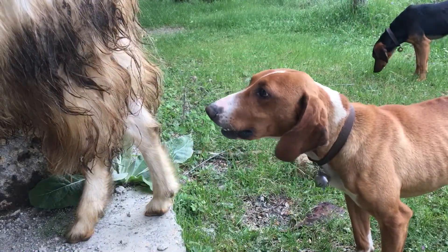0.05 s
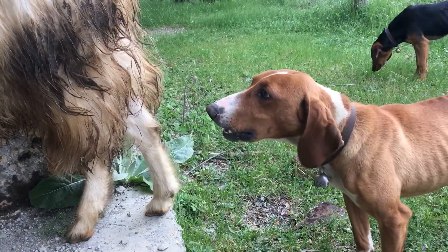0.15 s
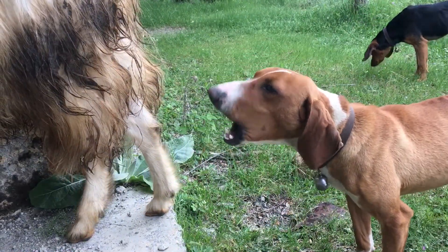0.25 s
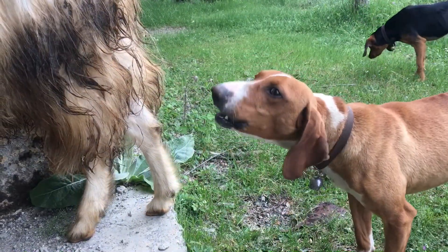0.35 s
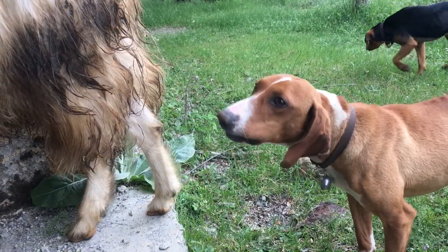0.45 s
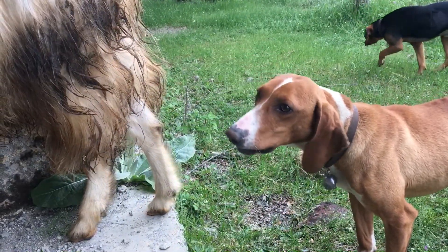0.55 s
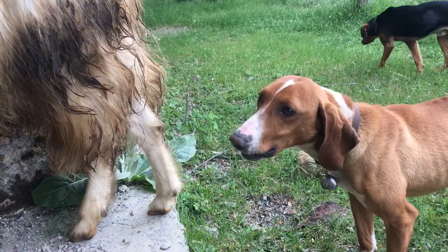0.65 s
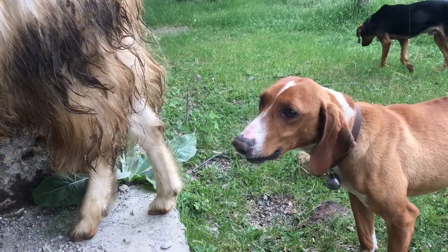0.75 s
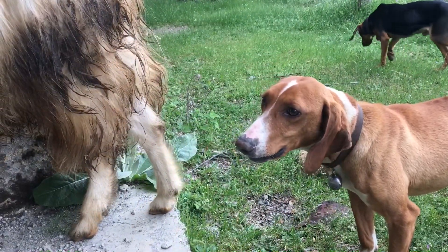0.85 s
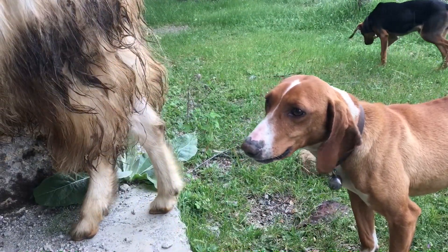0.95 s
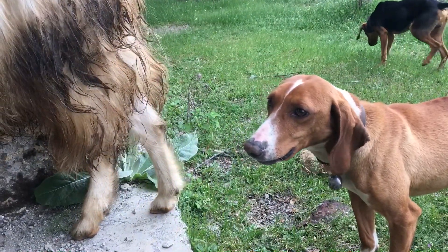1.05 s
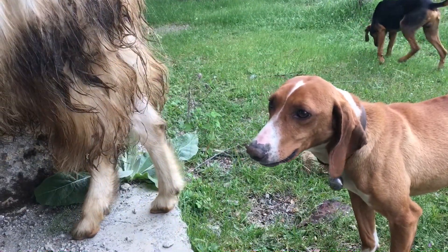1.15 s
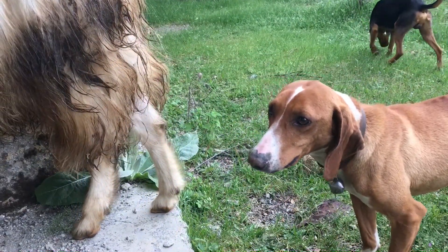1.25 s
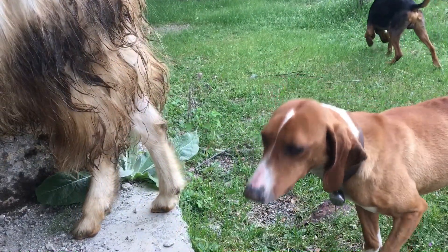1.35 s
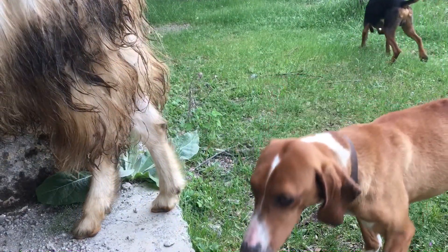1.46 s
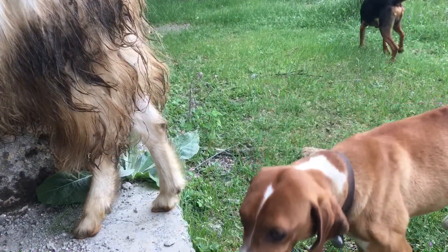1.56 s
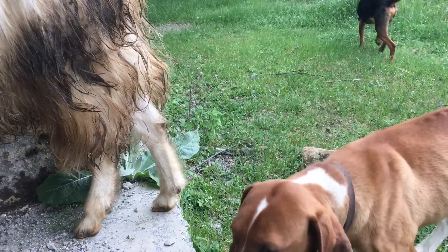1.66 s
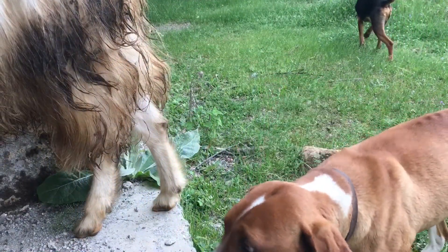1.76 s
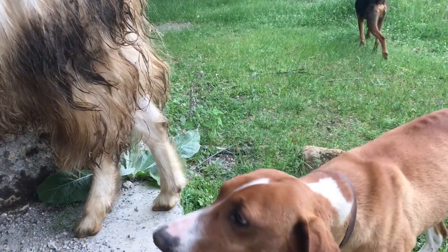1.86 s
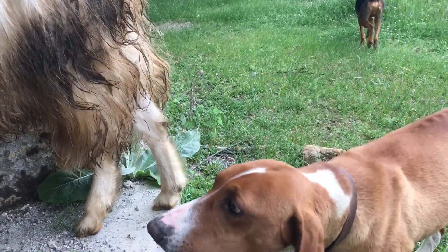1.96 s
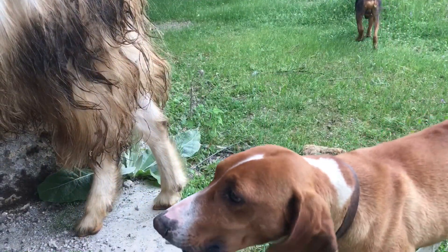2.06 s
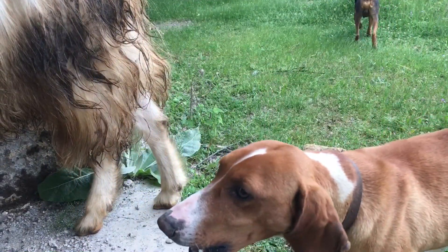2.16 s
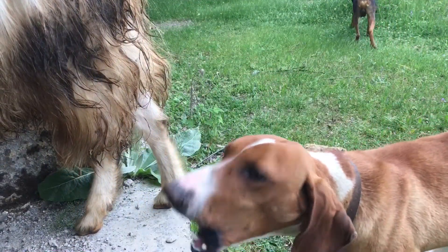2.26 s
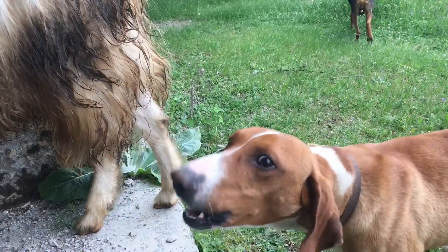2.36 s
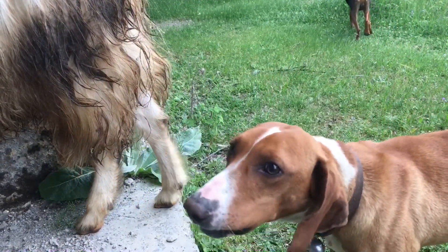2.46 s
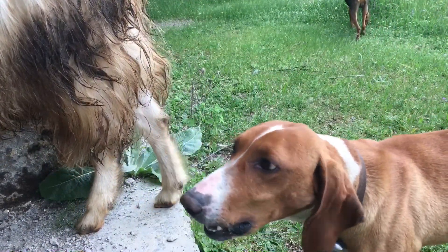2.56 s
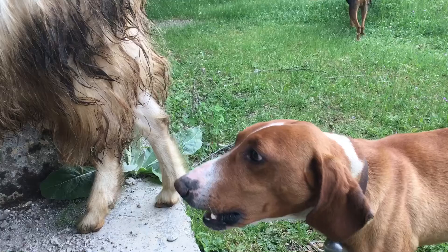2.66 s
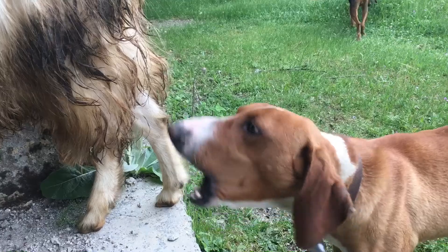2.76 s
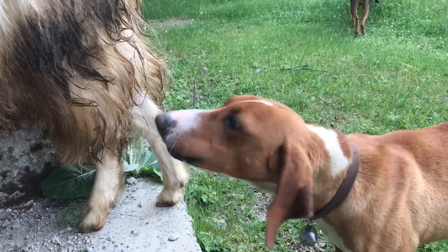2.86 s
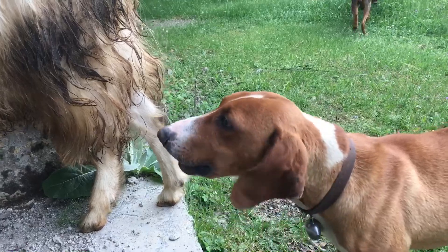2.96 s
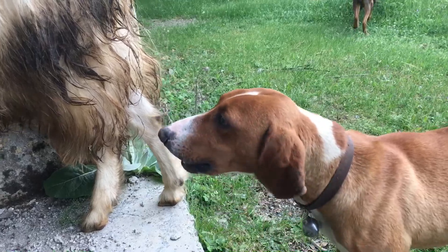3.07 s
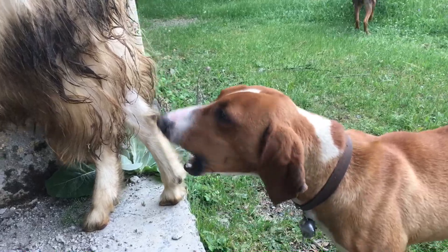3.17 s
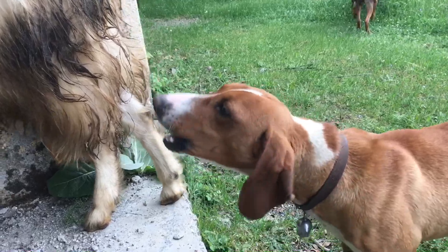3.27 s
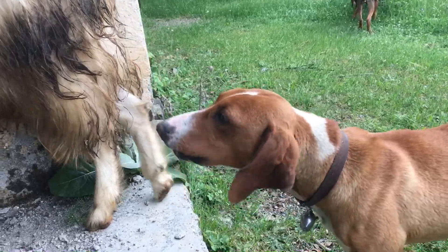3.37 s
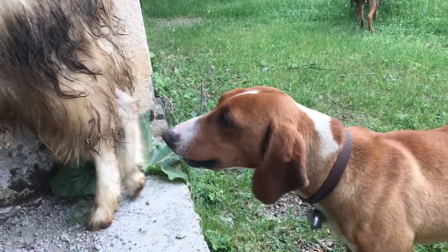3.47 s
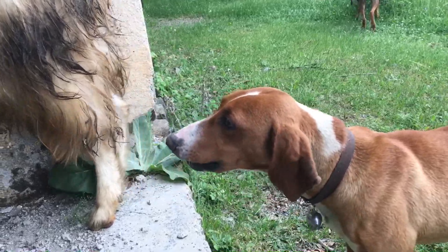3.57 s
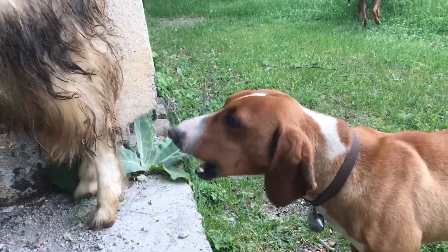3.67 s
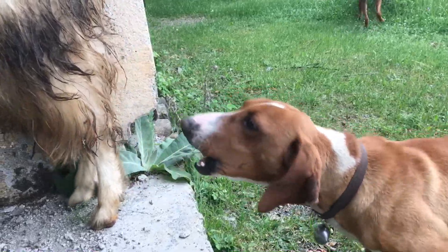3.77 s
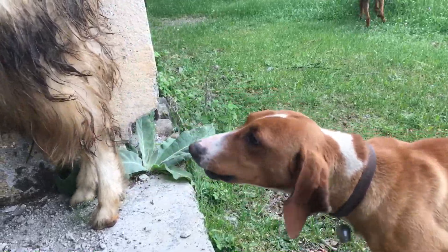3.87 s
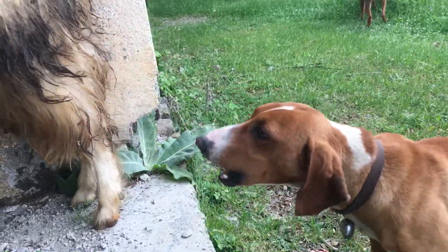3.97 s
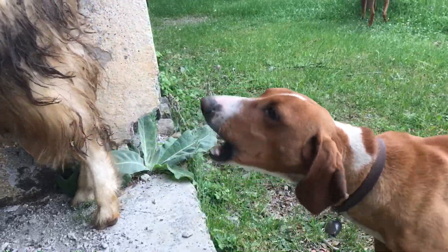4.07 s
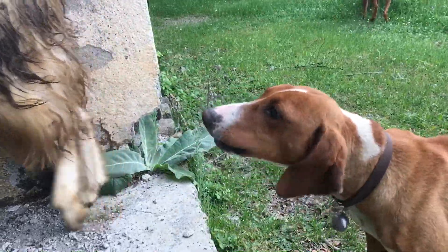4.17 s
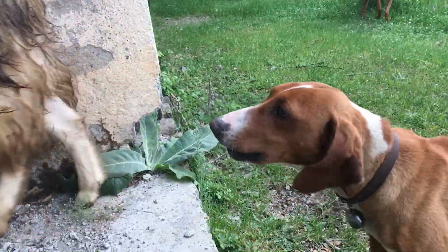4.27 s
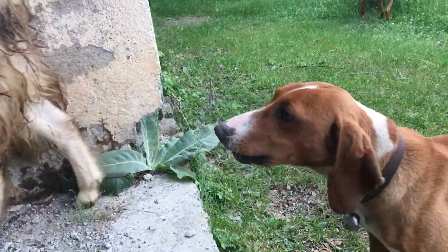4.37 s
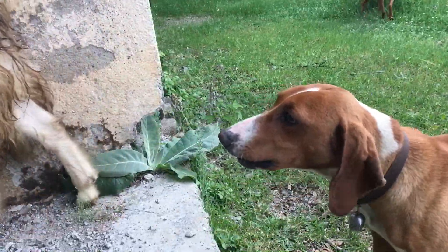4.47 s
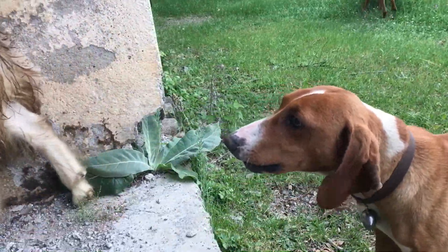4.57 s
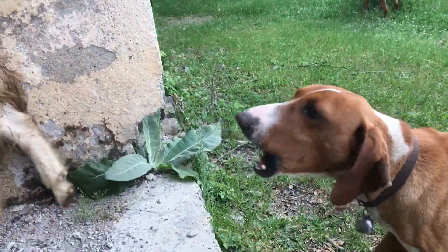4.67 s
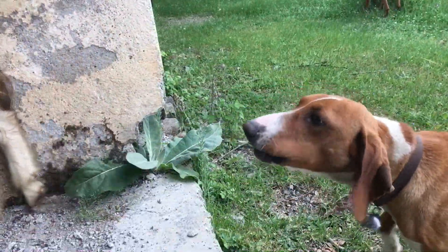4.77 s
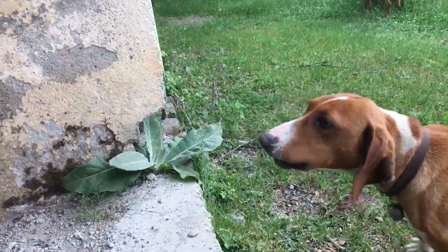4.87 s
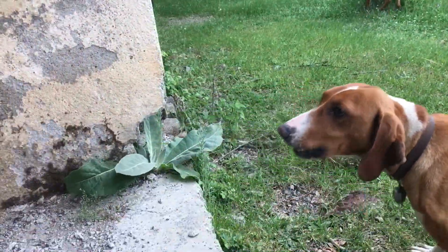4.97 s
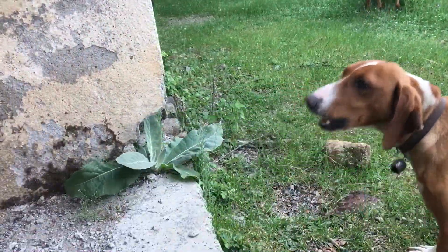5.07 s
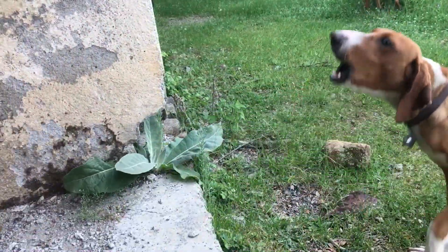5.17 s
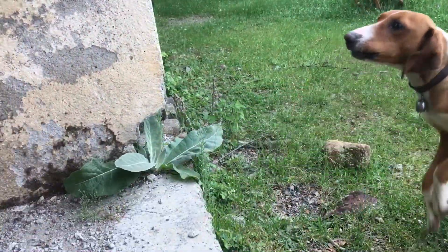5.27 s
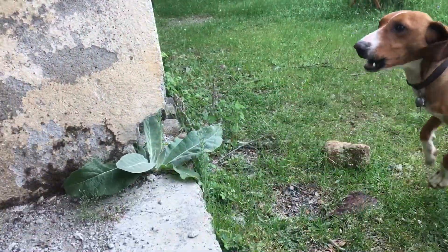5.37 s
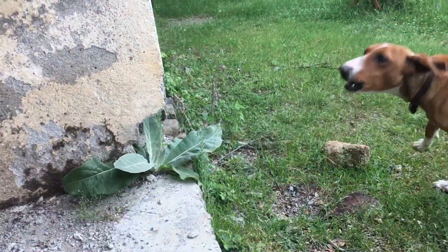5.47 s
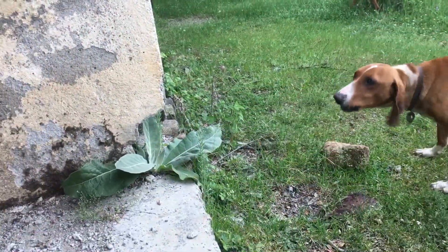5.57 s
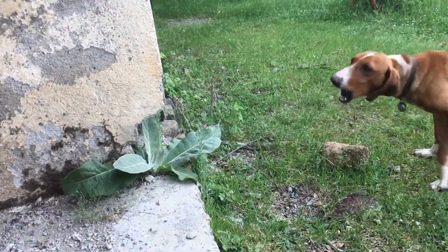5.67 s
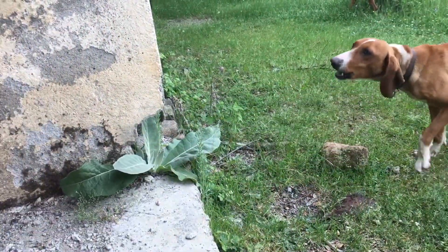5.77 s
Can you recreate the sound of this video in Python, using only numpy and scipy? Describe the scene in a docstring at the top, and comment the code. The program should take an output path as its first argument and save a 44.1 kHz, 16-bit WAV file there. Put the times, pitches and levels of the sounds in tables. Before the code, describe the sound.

A quiet grassy yard beside a stone wall, heard from close up. A faint collar tinkle at 0.3 s leads into a hound's first loud bark, about a tenth of a second long: pitch leaps up to a clear, bright crest and drops hoarsely, with quick echoes off wall and paving. A dull, low goat bell sounds around 0.25, 0.7 and 1.3 s. Grass rustles softly from 0.8 to 1.9 s, with a paw scuff, light thud and tiny clink near 1.6. Barking resumes at 1.9, 2.3, 2.8, 3.3, 3.8 and 4.1 s, the last two close together with a low groan between. The collar bell jingles brightly around 4.3 to 4.5 s. More barks come at 4.7 and 5.2, then two softer, slightly lower ones at 5.45 and 5.7 s, joined by groaning and a clear bell ting at 5.6. Soft air puffs bump the microphone under many barks.

```python
"""Hound barking at a goat

A hound close by barks eleven times at a goat beside a stone wall on a lawn, groaning low between the quickest barks.
Each bark is one arch of pitch: harmonics clear at the crest, noisy and hoarse on the flanks, thrown back by the wall.
Collar bell and goat bell are struck sets of dying sines; rustling grass, scuffing paws, puffs on the microphone
and still air are shaped noise."""
import sys
import numpy as np
from scipy import signal
from scipy.fft import rfft, irfft, next_fast_len
from scipy.io import wavfile
from scipy.ndimage import uniform_filter1d, minimum_filter1d

SR = 44100
rng = np.random.default_rng(int(sys.argv[2]) if len(sys.argv) > 2 else 0)


def pcm_store(signal):
    """Save signal as 16-bit PCM."""
    levels = np.round(np.clip(np.atleast_2d(signal), -1, 1) * 32767)
    wavfile.write(sys.argv[1], SR, levels.astype(np.int16).T)


N = 256659
TIME = np.arange(N) / SR
CUTOFF_HZ = 15800

# The barks: onset [t/s], crest [t/s], crest pitch [f/Hz], level [dB], brightness of the open mouth [dB],
# edge in the treble [dB], attack [t/s], puff of air on the microphone [dB]
BARK_EVENTS = [(.311, .394, 736.1, -8.5, -1.5, -0.5, .02, -36.5),
               (1.883, 1.969, 736.6, -9, 2, 0, .014, -29.5), (2.34, 2.421, 721.4, -7, -4, 2, .018, -30.5),
               (2.835, 2.895, 742, -7.5, -4, -6, .006, -48), (3.265, 3.338, 748, -11, -2, -4, 0.015, -61.5),
               (3.77, 3.841, 739.5, -6, -5.5, -3.5, .015, -37),
               (4.066, 4.155, 732.3, -7.5, -3, -4, .04, -26),
               (4.715, 4.795, 734.2, -7, -3, 0.5, .013, -32.5),
               (5.191, 5.267, 737.2, -10, -3.5, 0, 0.0096, -43),
               (5.45, 5.529, 651.6, -13.5, -2, 2.5, .042, -70),
               (5.715, 5.801, 685.7, -13, 3, 4.5, 0.045, -70)]
# pitch of the folds at rest and at full effort
REST_HZ, FULL_HZ = 131.5, 758.6
# narrow ring that the pitch sweeps through on each flank
RING_HZ, RING_WIDTH_HZ, RING_DB = 551.7, 66, 6.1


def hound(clear_db=-28, hoarse_db=-12, treble_db=-10, hiss_db=-31, grain_db=3.5, voice_db=-5.5,
          slack_hiss_db=-11, flow_db=-33, sag_db=-1, closing_db=-6, dulling_db=3.04, uneven=0.23, wobble=0.045):
    """Harmonics of the vocal folds and air pulsing through them, both shaped by throat and mouth."""
    # Throat and open mouth: [f/Hz], gain [dB]
    throat = [(130, -20), (300, -6.5), (480, 4.5), (720, 1.5), (920, -1), (1150, 6.5), (1500, 0), (1750, 4),
              (2200, 3), (2480, -9.5), (3300, -33), (4300, -28), (5000, -67)]
    pitch, push, flow = larynx()
    onset, crest, top_hz, _, bright_db, edge_db = np.transpose(BARK_EVENTS)[:6]
    # index of the bark that each sample belongs to
    which = np.searchsorted((releases()[:-1] + onset[1:]) / 2, TIME)

    # slack folds, well under the crest pitch, beat unevenly; only taut ones snap shut hard enough to make treble
    slack = np.clip((1 - pitch / top_hz[which]) / .38, 0, 1)
    taut = np.minimum(pitch / FULL_HZ, 1) ** 9
    closing = slack * (TIME > crest[which])
    jitter = (.002 + wobble * slack ** 1.2) * flutter(180)
    phase = 2 * np.pi * np.cumsum(pitch * (1 + jitter)) / SR

    on = push > 1e-4
    opening = (bright_db[which] + closing_db * closing)[on]
    low, high = np.zeros((2, N))
    for k in range(1, 25):
        hz = k * pitch[on]
        partial = np.cos(k * phase[on])
        # each partial wavers by itself, the high ones most
        waver_depth_db = min(.8 * k, 3.5) + 2.5 * slack[on]
        waver_points = TIME[::400]
        waver = np.interp(TIME[on], waver_points, rng.standard_normal(len(waver_points))) * waver_depth_db
        # the opening of the mouth acts on the band around 2 kHz
        opening_db = opening * np.interp(hz, [1500, 1850, 2400, 3200], [0, 1, 1, 0])
        low[on] += from_db(opening_db + waver - dulling_db * k * closing[on]) * partial
        high[on] += from_db(waver) * mouth(hz) * (hz < CUTOFF_HZ) * partial

    # while the folds tighten, strong and weak beats alternate
    alternation = uneven * (slack - closing) * np.cos(phase / 2)
    beats = 1 + alternation + (0.0099 + .45 * slack) * flutter(160)
    body = causal(low * beats * from_db(sag_db * slack), throat)
    treble = high * beats * taut * from_db(treble_db + edge_db[which])
    voice = body + treble

    # turbulence swells once a cycle, while the folds are open
    turbulence = rng.standard_normal(N) * (1 + 0.25 * np.cos(phase))
    highpass = signal.butter(3, 350, "high", fs=SR, output="sos")
    rasp = rms_one(signal.sosfilt(highpass, causal(turbulence, throat)))
    hiss = rms_one(coloured(turbulence, lambda hz: mouth(hz) ** .7))
    hiss *= from_db(hiss_db + edge_db[which] / 2 + grain_db * flutter(120))

    hoarseness = rasp * from_db(clear_db + (hoarse_db - clear_db) * slack)
    sibilance = hiss * (.5 + .5 * taut) * from_db(slack_hiss_db * slack)
    bark = push * (from_db(voice_db) * voice + hoarseness + sibilance)
    bark += flow * (from_db(flow_db) * rasp + 0.37 * hiss)
    return bark + resonance(bark, RING_HZ, RING_WIDTH_HZ, RING_DB) + groan(phase)


def larynx(rise_shape=2.2, fall_shape=3.5, head_start=.16, snap=.3,
           release_s=0.01, lead_s=0.025, exhale_s=0.0082):
    """Each push of the chest arches tension and pitch up and down; air flows a little longer than the voice."""
    # climb at the usual attack, and fall
    rise_s, usual_attack_s, fall_s = .095, 0.022, .052
    # on the way down the pitch catches on the lowest throat resonance: where, over what range, how firmly (0-1)
    catch_hz, catch_width_hz, catch = 505.8, 135, .8
    pitch = np.full(N, float(REST_HZ))
    push, flow = np.zeros((2, N))
    for (onset, crest, top_hz, db, _, _, attack, _), release in zip(BARK_EVENTS, releases()):
        # an abrupt bark starts from folds that are already taut, so its climb is flatter
        rise = rise_s * (usual_attack_s / attack) ** head_start
        distance = abs(TIME - crest)
        early = np.minimum(distance / rise, 2) ** rise_shape
        climb = np.exp(-early - snap * early ** 4)
        fall = 1 / (1 + (distance / fall_s) ** fall_shape)
        lift = (top_hz - REST_HZ) * np.where(TIME < crest, climb, fall)
        off = REST_HZ + lift - catch_hz
        pull = catch * off * np.exp(-(off / catch_width_hz) ** 2) * (TIME > crest)
        pitch += lift - pull
        voiced = gate(onset - lead_s, release - .004, lead_s / 2, release_s)
        push += from_db(db) * swell(onset, attack) * voiced
        flow += from_db(db) * gate(onset - lead_s, release, lead_s + attack, exhale_s)
    # as the pitch collapses at the end of a bark, the folds lose their drive
    drive = np.minimum(pitch / 440, 1) ** 3.5
    return pitch, push * drive, flow


def releases(full_hold_s=0.061):
    """When each bark lets go: a lower, weaker push gives out sooner after its crest."""
    crest, top_hz = np.transpose(BARK_EVENTS)[1:3]
    return crest + full_hold_s * (top_hz / FULL_HZ) ** 5.1


def swell(onset, attack, steepness=5.0):
    """Pressure builds along an S-curve that is half way up in the middle of the attack."""
    return .5 + .5 * np.tanh(steepness / 2 * ((TIME - onset) / attack - .5))


def mouth(hz):
    """Gain of the upper mouth resonances, summed as power."""
    # Upper mouth resonances: centre [f/Hz], width [f/Hz], level [dB]
    formants = [(5150, 350, -1), (5800, 500, -6), (6500, 400, -9), (7300, 500, -14), (8950, 600, -12),
                (11800, 1300, -19), (14500, 2500, -26)]
    power = 0
    for centre, width, db in formants:
        power = power + from_db(db) ** 2 / (1 + ((hz - centre) / width * 2) ** 2) ** 1.4
    return np.sqrt(power)


def groan(phase, trail_db=-19, trail_s=0.0099, octave_db=-17, link_s=.2, link_db=-47.5, link_db_per_s=129):
    """Mouth shut, each bark trails into a soft groan, almost all fundamental, that bridges the shortest gaps."""
    onset, _, _, db = np.transpose(BARK_EVENTS)[:4]
    release = releases()
    level = np.zeros(N)
    for end, own_db in zip(release, db):
        level += from_db(own_db + trail_db) * gate(end - .012, end + 0.013, 0.01, trail_s)
    # the shorter the gap, the louder the groan that links two barks
    for end, start in zip(release, onset[1:]):
        gap = start - end
        if gap < link_s:
            level += from_db(link_db + link_db_per_s * (link_s - gap)) * gate(end, start, 0.021, 0.019)
    return level * (np.cos(phase) + from_db(octave_db) * np.cos(2 * phase))


def yard(x, tail_db=-15, t60=0.28):
    """A few hard echoes off wall and paving, then a short scattered tail."""
    # Wall and paving echoes: delay [t/s], level [dB]
    echoes = [(.0043, -19.5), (.0078, -28), (.0122, -11), (.0185, -27.5), (.031, -19)]
    # Colour of the diffuse ring: [f/Hz], level [dB]
    tail_colour = [(100, -14.5), (380, -9), (500, 6.5), (640, 0.5), (900, -5.5), (1200, -3.5), (2200, -6),
                   (4000, -4.5), (15000, -7)]
    t = TIME[:SR]
    decay = from_db(tail_db - 60 * t / t60)
    scatter = coloured(rng.standard_normal(SR), lambda hz: gain_at(tail_colour, hz))
    response = scatter * decay * np.clip(t / .012, 0, 1) / np.sqrt(0.06 * SR)
    for delay, db in echoes:
        response[round(delay * SR)] += from_db(db)
    return x + signal.fftconvolve(x, response)[:N]


def lingering(start_db=-36, decay_s=0.043):
    """Noise through a narrow resonance dies away at the start, like the yard ringing from an earlier bark."""
    ring = rms_one(resonance(rng.standard_normal(N), RING_HZ, 40, 0))
    return from_db(start_db) * ring * gate(0, 0, 0.0004, decay_s)


def bells():
    """Collar bell, goat bell and a small clink of collar hardware; clappers wake the modes differently."""
    # Collar bell strikes: [t/s], level [dB], hardness [dB], place on the rim [0-1]
    collar_strikes = [(.0014, -37, -3, 0), (0.2892, -22.5, -0.5, 0.43), (0.4608, -29, -3, 0.08),
                      (2.159, -35.5, -9.5, 0), (2.578, -44.5, -6.5, 0.2), (3.966, -34, -6, 0.5),
                      (4.294, -34, -2.5, 0.4), (4.401, -22, -2, .95), (4.528, -28.5, -3, .45),
                      (5.613, -20.5, -3, 0.57), (5.678, -32, 15, 0.68)]
    # Collar bell modes: [f/Hz], level [dB], t60 [t/s]
    collar_modes = [(2277, -2.5, 0.12), (2420, -20, 0.08), (3186, -27, 0.63), (6445, -9, 0.39),
                    (6760, -18.5, 1), (11770, -29.5, 0.17), (11800, -22, 0.17)]
    # Goat bell strikes: [t/s], level of the lowest mode [dB], level of the others [dB]
    goat_strikes = [(.257, -29.5, -28), (0.706, -30.5, -28.5), (1.334, -35, -43.5), (2.221, -47.5, -30),
                    (2.713, -57, -38)]
    # Goat bell modes: [f/Hz], level [dB], t60 [t/s]
    goat_modes = [(827, 4, 0.38), (3112, -30.5, 1.2), (4269, -27, 0.23), (6751, -37, .6), (8300, -23.5, .2),
                  (9500, -26.5, 0.32), (9000, -29, 0.23), (11100, -35, 0.11)]
    # Collar hardware modes: [f/Hz], level [dB], t60 [t/s]
    clink_modes = [(3100, 2.5, 0.081), (3340, -2, 0.064), (5440, -2, 0.036)]
    clink_s, clink_db = 1.552, -37
    collar_touches = [(s, clapper(db, hard_db, place)) for s, db, hard_db, place in collar_strikes]
    goat_touches = [(s, [low] + [high] * (len(goat_modes) - 1)) for s, low, high in goat_strikes]
    collar = bell(collar_touches, collar_modes, swell_cycles=5.6)
    goat = bell(goat_touches, goat_modes)
    clink = bell([(clink_s, [clink_db] * len(clink_modes))], clink_modes)
    return collar + goat + clink


def clapper(db, hard_db, place):
    """A hard touch wakes the upper four collar modes; its place on the rim favours one of the lower two of them."""
    angle = np.pi / 2 * np.clip(place, .01, .99)
    first_db, second_db = 20 * np.log10([np.cos(angle), np.sin(angle)])
    return db + np.array([0, 0, 0, hard_db + first_db, hard_db + second_db, hard_db, hard_db])


def bell(strikes, modes, swell_cycles=3.7):
    """Every mode swells over a few cycles and rings as a dying sine; strikes are (s, dB of each mode)."""
    out, t = np.zeros(N + SR), TIME[:SR]
    for s, levels in strikes:
        at = max(round((s - .001) * SR), 0)
        for (hz, db, t60), strike_db in zip(modes, levels):
            build = np.sin(np.pi / 2 * np.minimum(t * hz / swell_cycles, 1)) ** 2
            decay = from_db(strike_db + db - 60 * t / t60)
            out[at:at + SR] += decay * np.sin(2 * np.pi * hz * t) * build
    return out[:N]


def ground(tick_db=-50, ticks_per_s=14, hardest_slide_s=0.021, slide_growth=0.29, thud_s=0.047, swell_share=0.28):
    """Paws scuff, the harder the longer, and land with a soft thud; blades of grass brush and tick."""
    # Paws scuffing grass and grit: [t/s], level [dB]
    scuffs = [(1.124, -50.5), (1.547, -45.5), (1.602, -30), (3.637, -57.5), (3.942, -50), (5.037, -60),
              (5.108, -57.5)]
    # Colour of scuffs and ticks: [f/Hz], level [dB]
    scuff_colour = [(150, -15), (400, -2), (1000, -3), (2500, 0), (4200, -7), (6200, -4), (15500, -17)]
    # Paws landing: [t/s], level [dB]
    steps = [(1.123, -53.5), (1.248, -49.5), (1.604, -44.5), (1.686, -68)]
    # The dog brushing through grass: start [t/s], end [t/s], level [dB]
    rustles = [(0.81, 1.858, -52.5), (2.204, 2.297, -57.5), (4.532, 4.706, -59.5), (5.033, 5.142, -58.5)]
    # Colour of the brushed grass: [f/Hz], level [dB]
    rustle_colour = [(100, -6), (400, -9), (1100, -5), (1600, -8), (2300, 0), (3600, -13), (5500, -6),
                     (8000, -15), (11000, -18), (15500, -27)]
    thud_colour = [(30, -23), (120, 4.0), (350, 5.5), (900, -100)]  # (Hz, dB)

    scuff, thud, brush = np.zeros((3, N))
    hardest_db = max(db for _, db in scuffs)
    for s, db in scuffs:
        slide_s = hardest_slide_s * from_db(slide_growth * (db - hardest_db))
        scuff += from_db(db) * gate(s - .002, s + 0.0011, 0.0074, slide_s)
    for s, db in steps:
        thud += from_db(db) * gate(s, s + 0.013, 0.0046, thud_s)
    for start, end, db in rustles:
        brush += from_db(db) * gate(start, end, swell_share * (end - start), 0.03)

    # sparse random impulses, each smeared into a burst of under a millisecond or so
    ticks = (rng.random(N) < ticks_per_s / SR) * rng.standard_normal(N) * from_db(tick_db)
    burst = rng.standard_normal(200) * np.exp(-TIME[:200] / .0008)
    ticks = coloured(signal.fftconvolve(ticks, burst)[:N], lambda hz: gain_at(scuff_colour, hz))
    grit = scuff * noise(scuff_colour) * from_db(7.2 * flutter(140))
    grass = brush * noise(rustle_colour) * from_db(1.2 * flutter(40))
    return grit + ticks + thud * noise(thud_colour) + grass


def puffs(decay_s=0.0077, gusty_db=-1.5, delay_s=.022, calm_db=-82, gust_db=-65.5):
    """Air thrown out by each bark bumps the microphone just after the onset; a light breeze rumbles on it."""
    bump_colour = [(25, -18), (120, 0.0), (250, -12.5), (600, -31.0)]  # (Hz, dB)
    breeze_colour = [(20, -10.5), (55, -4.5), (130, -8.0), (400, -21.0), (1000, -50.5)]  # (Hz, dB)
    bump = np.zeros(N)
    for onset, *_, puff_db in BARK_EVENTS:
        start = onset + delay_s
        bump += from_db(puff_db) * gate(start, start + 0.014, 0.024, decay_s)
    # one gust over a calm level, both wavering slowly
    breeze = from_db(calm_db) + from_db(gust_db) * gate(.52, 1.95, 0.21, 0.3)
    breeze = breeze * from_db(gusty_db * flutter(2.7))
    return bump * noise(bump_colour) + breeze * noise(breeze_colour)


def still_air(level_db=-60.5):
    """Still outdoor air: steady shaped noise that wavers slightly."""
    # Colour of the air: [f/Hz], level [dB]
    air_colour = [(25, -10), (70, -4), (200, -6), (600, -4), (1200, -10), (2200, -10), (4000, -19),
                  (9000, -24), (15500, -28)]
    return from_db(level_db) * noise(air_colour) * from_db(0.5 * flutter(3.1))


def from_db(db):
    """Decibels to gain."""
    return 10 ** (np.asarray(db) / 20)


def rms_one(x):
    """Scale to unit rms."""
    return x / np.sqrt(np.mean(x ** 2) + 1e-20)


def gain_at(points, hz):
    """Gain of a (Hz, dB) spectrum at any frequency."""
    at, db = np.transpose(points)
    return from_db(np.interp(np.log(np.maximum(hz, 1)), np.log(at), db))


def coloured(x, gain):
    """Filter by a gain that is a function of frequency."""
    size = next_fast_len(len(x) + 4096)
    return irfft(rfft(x, size) * gain(np.fft.rfftfreq(size, 1 / SR)), size)[:len(x)]


def causal(x, points):
    """Filter by a (Hz, dB) spectrum with the minimum phase that real resonances have."""
    size = 2 * next_fast_len(N // 2 + 4096)
    # folding the cepstrum onto positive time gives the minimum phase
    cepstrum = irfft(np.log(gain_at(points, np.fft.rfftfreq(size, 1 / SR))))
    cepstrum[1:size // 2] *= 2
    cepstrum[size // 2 + 1:] = 0
    return irfft(rfft(x, size) * np.exp(rfft(cepstrum)), size)[:N]


def resonance(x, hz, width_hz, db):
    """One two-pole resonance of the given height."""
    r = np.exp(-np.pi * width_hz / SR)
    zeros = (1 - r * r) / 2 * np.array([1, 0, -1])
    poles = [1, -2 * r * np.cos(2 * np.pi * hz / SR), r * r]
    return from_db(db) * signal.lfilter(zeros, poles, x + 1e-18)


def noise(points):
    """Unit noise with a (Hz, dB) spectrum."""
    return rms_one(coloured(rng.standard_normal(N), lambda hz: gain_at(points, hz)))


def flutter(rate_hz):
    """Random motion of spread 1, mostly slower than the given rate."""
    return rms_one(coloured(rng.standard_normal(N), lambda hz: 1 / (1 + (hz / rate_hz) ** 2)))


def gate(start, end, attack, release):
    """Opens smoothly at the start and dies away after the end."""
    opening = np.sin(np.pi / 2 * np.clip((TIME - start) / attack, 0, 1)) ** 2
    return opening * np.exp(-np.clip((TIME - end) / release, 0, 40))


def scene():
    """The hound in the yard, the bells, the grass, the puffs and the air."""
    return (yard(hound()) + lingering() + bells() + ground() + puffs() + still_air())[None]


def record(dry):
    """A fast limiter holds the peaks to full scale, then the top is cut."""
    gain = 1 / np.maximum(1, abs(dry))
    gain = uniform_filter1d(minimum_filter1d(gain, size=300), size=300)
    lowpass = signal.ellip(10, .1, 90, CUTOFF_HZ, fs=SR, output="sos")
    return signal.sosfilt(lowpass, dry * gain)


dry = scene()
out = record(dry)
pcm_store(out)
```